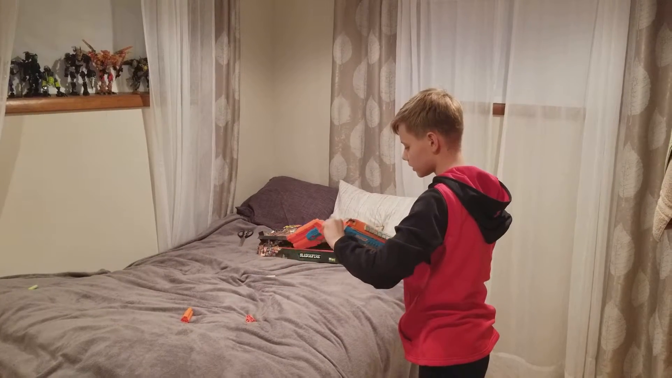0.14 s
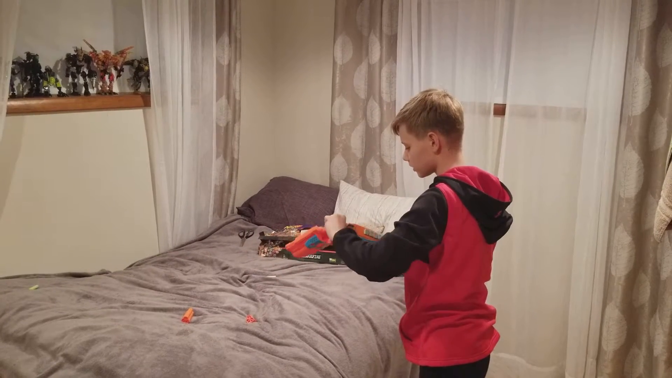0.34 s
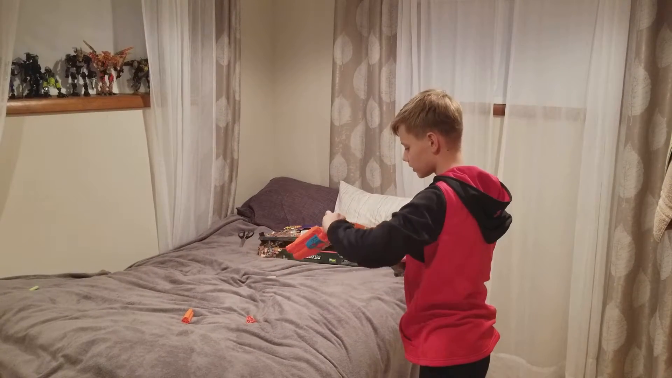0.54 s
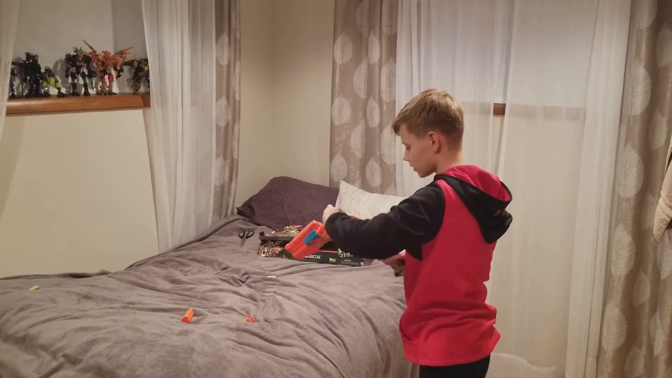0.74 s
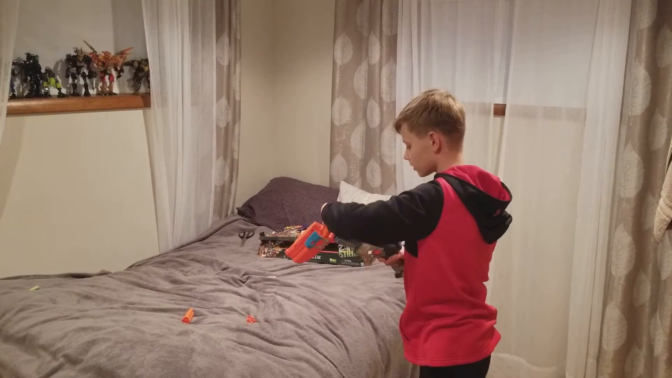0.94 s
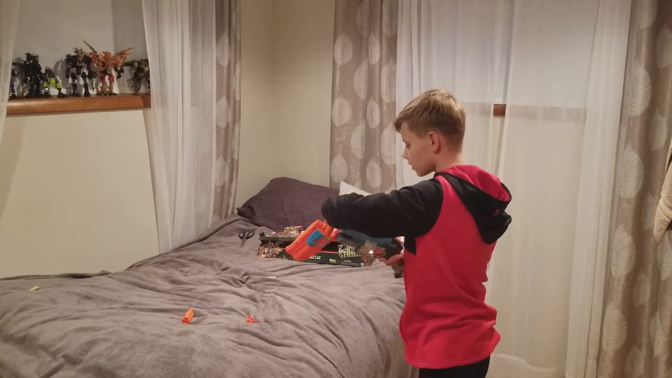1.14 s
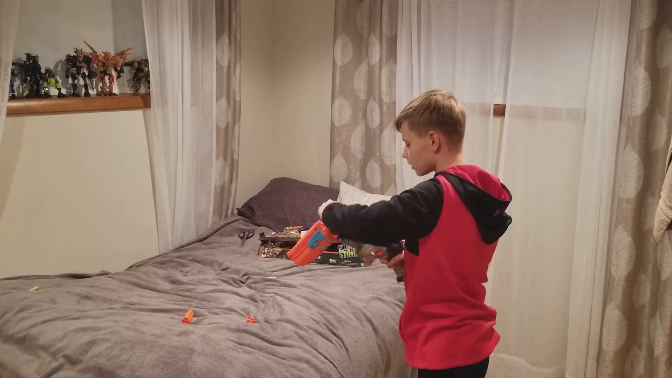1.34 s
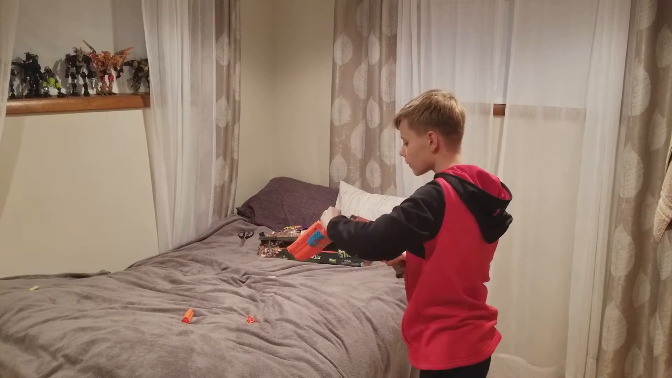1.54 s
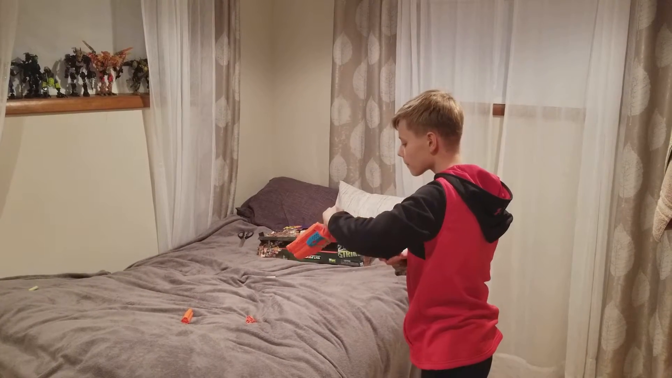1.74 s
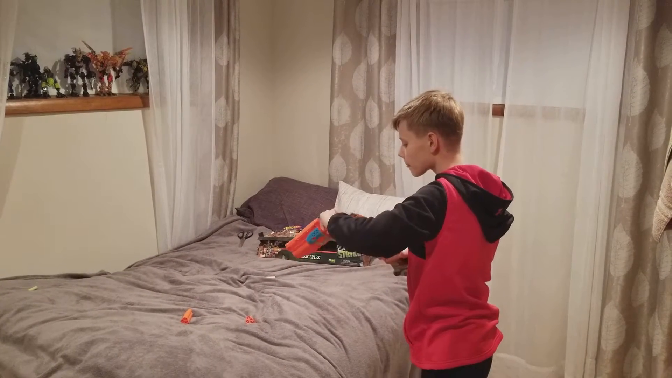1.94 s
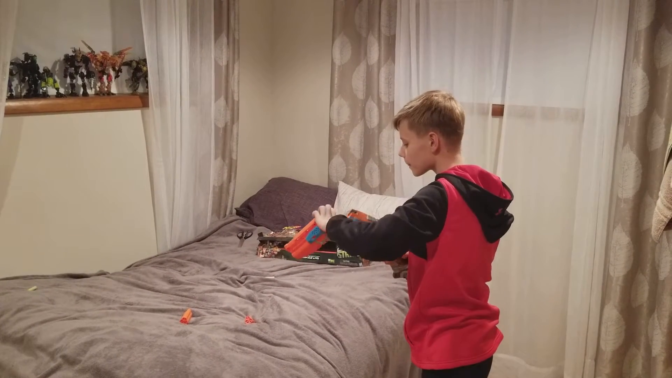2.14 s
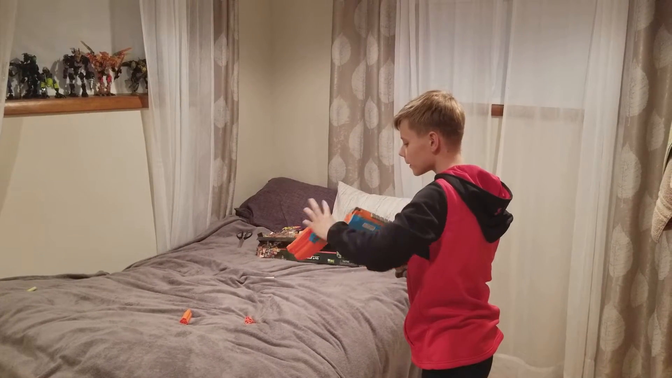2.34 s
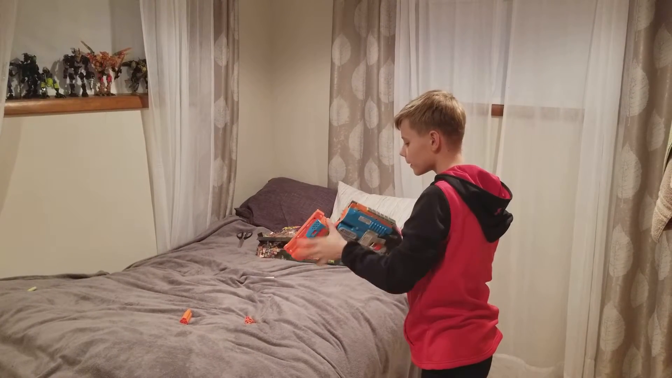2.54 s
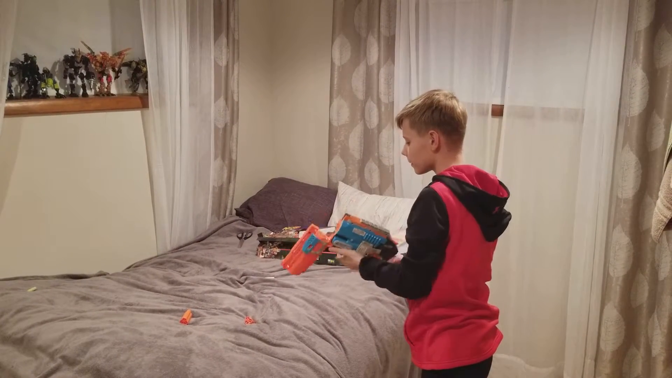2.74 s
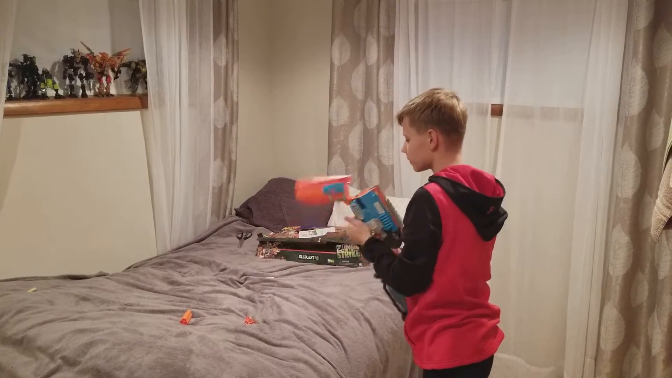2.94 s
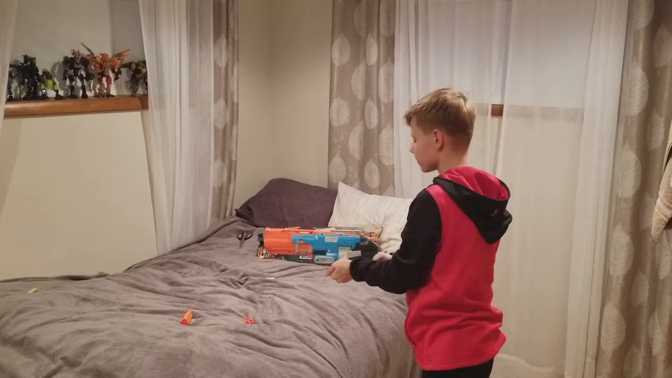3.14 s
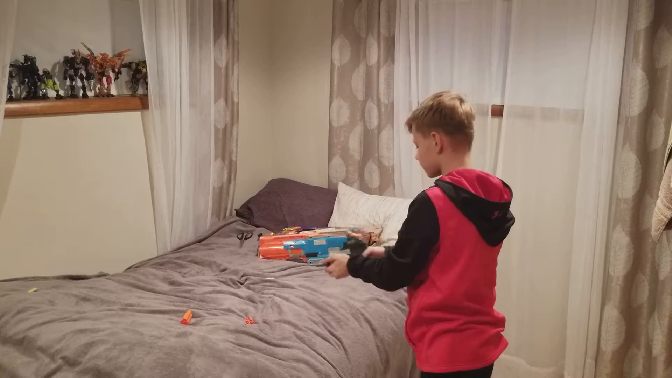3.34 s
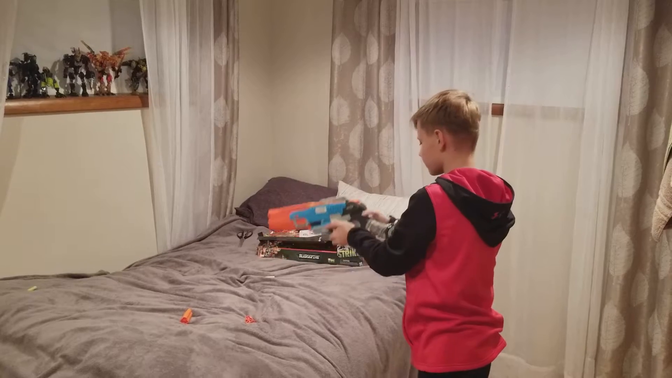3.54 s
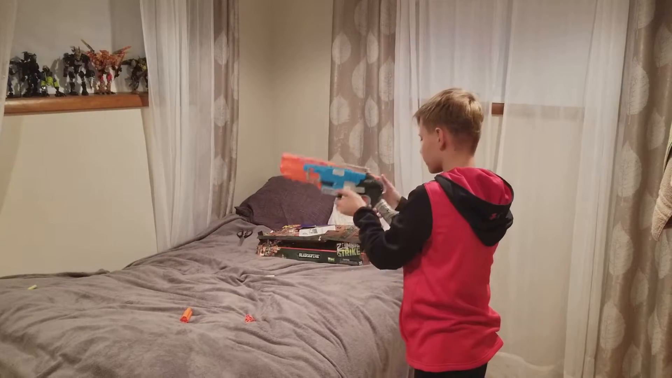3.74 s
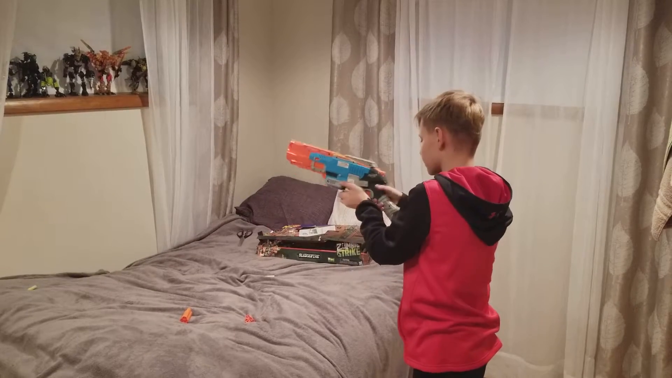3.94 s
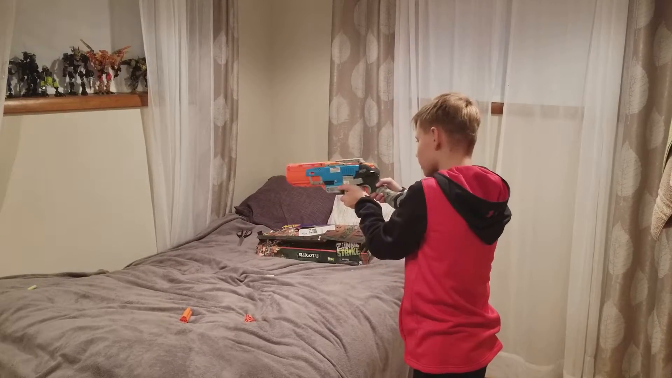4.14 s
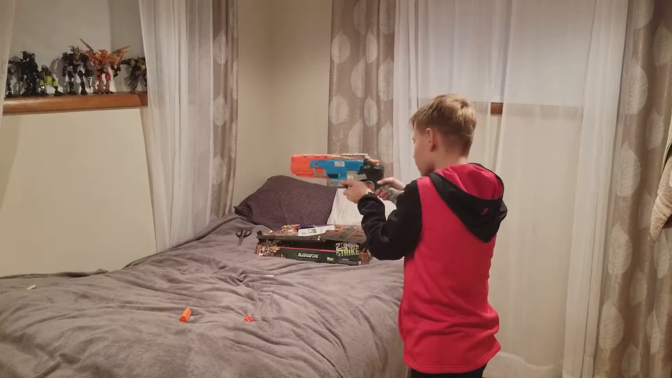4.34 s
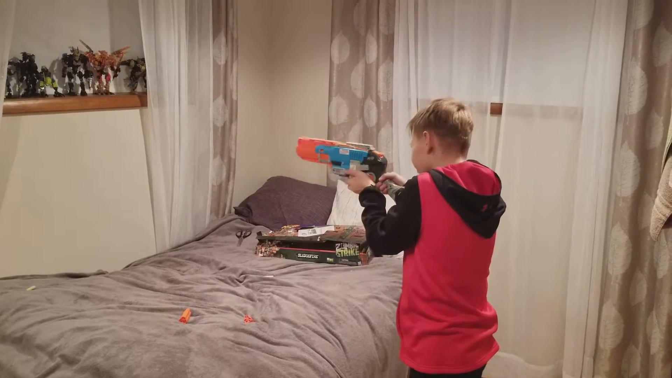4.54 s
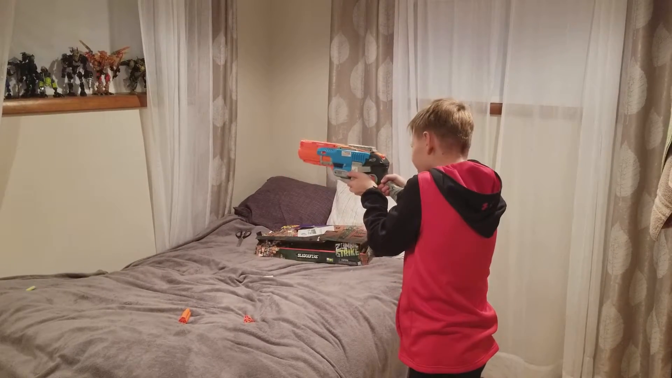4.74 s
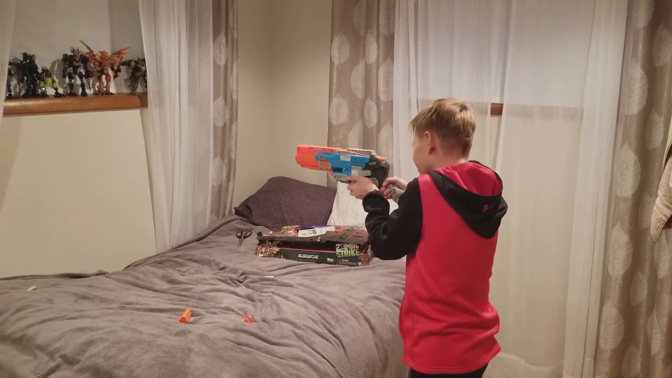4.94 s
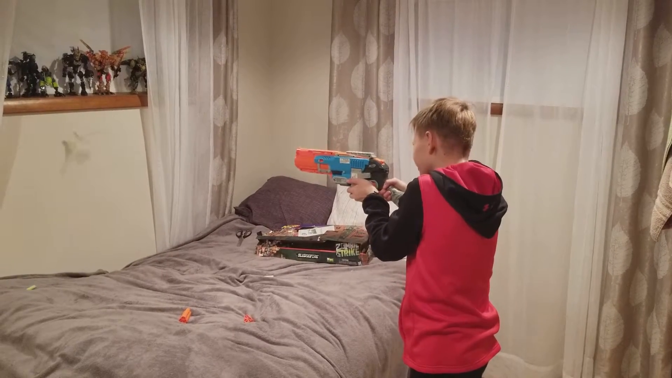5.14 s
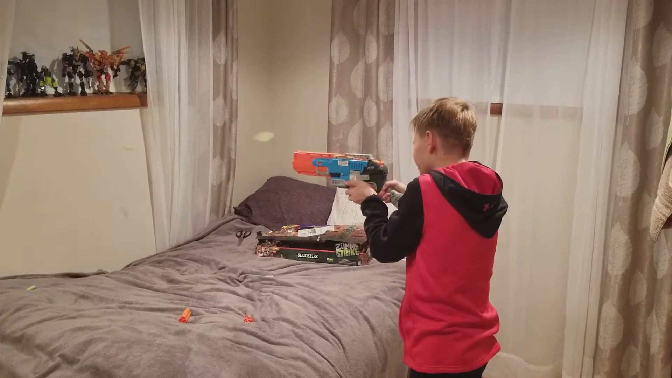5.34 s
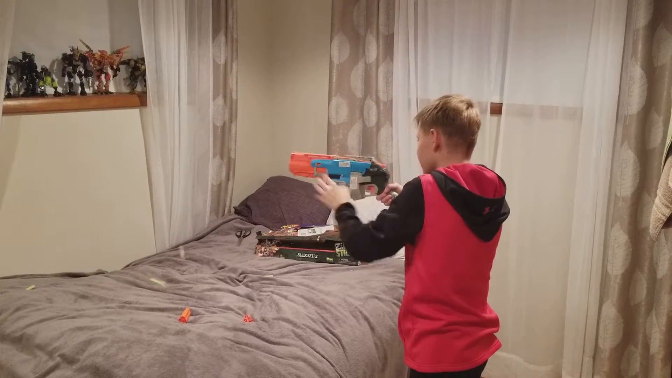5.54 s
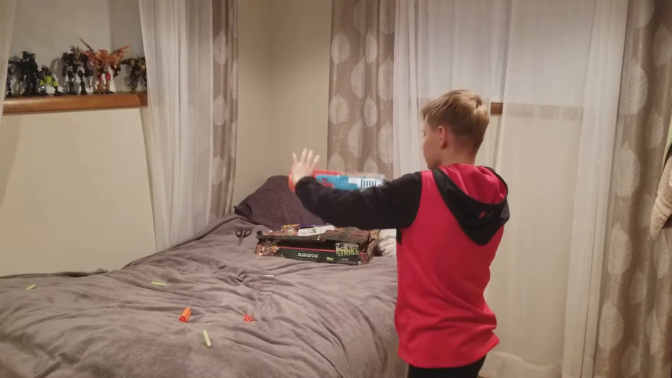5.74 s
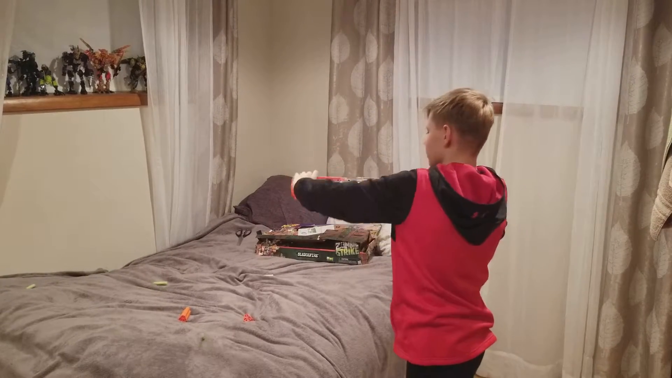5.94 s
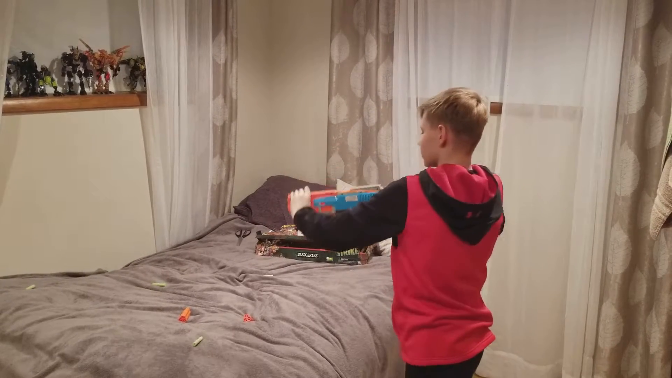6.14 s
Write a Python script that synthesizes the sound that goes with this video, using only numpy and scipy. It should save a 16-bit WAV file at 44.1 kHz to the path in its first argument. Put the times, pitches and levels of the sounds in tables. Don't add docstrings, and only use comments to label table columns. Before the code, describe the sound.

A small furnished bedroom with short echo, low house rumble and thin hiss, heard by a phone a few metres away. From 0 to 0.6 s, hollow plastic ticks, foam rubbing and bright scrapes as darts are seated in a toy blaster. Near quiet until 1.1 s, then more soft clicks and rubs to 1.6 s, and a busier scraping run from 1.8 to 2.2 s with a crisp latch at 1.94. A firm double clack lands at 2.3 s, with lighter clicks around 2.5. At 2.95 s a rasp rises straight into a very loud, sharp cocking slam at 3.0, leaving a faint metallic spring ring. The background dips, with few small ticks near 3.8 to 4.4 s. At 5.06 s the shot: plunger thump, low air boom, then a hard dart smack at 5.14 and a small bounce at 5.26. Faint rubbing and a soft grip click close by 5.9 s.

```python
import sys
import numpy as np
from scipy import signal
from scipy.fft import rfft, irfft
from scipy.io import wavfile
from scipy.ndimage import uniform_filter1d

SR = 44100
rng = np.random.default_rng(int(sys.argv[2]) if len(sys.argv) > 2 else 0)


def generate_wav(sig):
    pcm = np.round(np.clip(np.atleast_2d(sig).T, -1, 1) * 32767).astype(np.int16)
    wavfile.write(sys.argv[1], SR, pcm)


def nominal_scale(level):
    x = np.asarray(level, float) / 20
    return 10 ** x


N = 272979


def evened(x):
    return x / np.sqrt(np.mean(x ** 2) + 1e-20)


def read(points, hz):
    f, value = np.transpose(points)
    return np.interp(np.log(hz + 1), np.log(f + 1), value)


def add(mix, start_s, sound):
    part = mix[round(start_s * SR):][:len(sound)]
    part += sound[:len(part)]


def band(x, lo_hz, hi_hz):
    return signal.sosfilt(signal.butter(2, [lo_hz, hi_hz], "bandpass", fs=SR, output="sos"), x)


def ring(hz, level_db, t60_s, size=2500):
    t = np.arange(size) / SR
    return nominal_scale(level_db - 60 * t / t60_s) * np.sin(2 * np.pi * hz * t)


def partly_alike(left, other, likeness):
    return likeness * left + np.sqrt(1 - likeness ** 2) * other


# hz [Hz], level_db [dB]
FLOOR = [(24, -28), (70, -0.6), (160, -13.5), (270, -14), (400, -32), (650, -39), (1640, -49.5),
         (15500, -57.5)]
# hz [Hz], likeness [0-1]
FLOOR_LIKENESS = [(60, 1), (130, .93), (290, 1), (640, 0.2), (1400, .01), (15000, .01)]
# start_s [s], gain_db [dB]
SLOW_GAIN = [(0, 3), (2.949, 1.5), (3.1, -5.5), (4.05, -7), (4.4, 1.1), (5.05, .6), (5.2, -4), (5.7, .4),
             (6.19, -2.5)]


def background():
    size, hop = 2048, 512
    level_db, hiss_share, hiss_db = -56.5, .7, 5.5
    frames, hz = N // hop + 5, np.fft.rfftfreq(size, 1 / SR)
    a, b, c, d = rng.standard_normal((frames, len(hz), 4)).T
    left = a + 1j * b
    likeness = np.clip(read(FLOOR_LIKENESS, hz), -1, 1)[:, None]
    noise = np.array([left, partly_alike(left, c + 1j * d, likeness)])
    noise *= nominal_scale(read(FLOOR, hz))[:, None]
    noise *= nominal_scale(level_db) / np.std(signal.istft(noise[0], nperseg=size, noverlap=size - hop)[1])
    start_s, gain_db = np.transpose(SLOW_GAIN)
    gain_db = np.interp(np.arange(frames) * hop / SR, start_s, gain_db)
    rumble = np.clip(np.log2(1200 / (hz + 1)) / 2, 0, 1)[:, None]
    noise *= nominal_scale((rumble + (1 - rumble) * hiss_share) * gain_db + (1 - rumble) * hiss_db)
    return signal.istft(noise, nperseg=size, noverlap=size - hop)[1][:, :N]


def chatter_of(contact_s, rise_s, size):
    t, contact_s = np.arange(size) / SR, np.clip(contact_s, 5e-4, .008)
    cluster = rng.standard_normal(size) * np.exp(-t / contact_s) * np.minimum(t / rise_s, 1)
    z = rfft(cluster)
    power = abs(z) ** 2
    even = irfft(z / np.sqrt(power + 0.21 * np.mean(power)), size)
    return even * np.exp(-(t / (4 * contact_s)) ** 2)


# hz [Hz], level_db [dB], t60_s [s]
SHELL = [(618, -1.5, 0.025), (770, -15.5, 0.01), (1027, 0, 0.036), (1410, -2.5, .02), (1650, -5.5, .02),
         (1890, 16.5, .02), (2150, 16, .02), (2654, 9.5, .015), (3040, 10, 0.036), (3700, 8.5, 0.005),
         (4230, 3, 0.04), (5500, 7.5, 0.0078)]


def tick(treble_db, start_s, peak_db, pitch_hz, hollow_db):
    size = 3000
    contact_s = .0016 - .00005 * peak_db
    chatter = chatter_of(contact_s, 0.27 * contact_s + 1e-4, size)
    shift = rng.uniform(0.92, 1.02, len(SHELL))
    modes = [ring(hz * k, db - 9 * abs(np.log2(hz / pitch_hz)) / .7, t60_s)
             for k, (hz, db, t60_s) in zip(shift, SHELL)]
    body = signal.fftconvolve(chatter, sum(modes[2:]) + ring(pitch_hz, 9, 0.026))[:size]
    hollow = signal.fftconvolve(chatter, sum(ring(*mode) for mode in SHELL[:2]))[:size]
    crack = band(chatter, pitch_hz / 1.45, pitch_hz * 1.35) + .22 * band(chatter, 800, 5200)
    parts = (band(body, 750, 6200), crack, band(chatter, 4500, 13000), band(hollow, 520, 850))
    body, crack, fizz, hollow = (part / abs(part).max() for part in parts)
    mix = nominal_scale(-2.5) * body + crack + nominal_scale(treble_db) * fizz + nominal_scale(hollow_db) * hollow
    return start_s, nominal_scale(peak_db - 0.5) * mix


def stroke(treble_db, top_s, level_db, rise_s, fall_s, pitch_hz):
    slips_per_s, spread_db, width_hz = 1200, 5, 700
    corners_s = [max(top_s - rise_s, 0), top_s, top_s + fall_s]
    t = np.arange(corners_s[0], corners_s[-1], 1 / SR)
    light_db, light_treble_db = level_db - 25, treble_db + 1.5
    swell = nominal_scale(np.interp(t, corners_s, [light_db, level_db, light_db]) - 5)
    treble = nominal_scale(np.interp(t, corners_s, [light_treble_db, treble_db, light_treble_db]))
    slips = (rng.random(len(t)) < slips_per_s / SR) * rng.standard_normal(len(t))
    slips = slips * nominal_scale(spread_db * np.minimum(rng.exponential(1, len(t)), 4))
    body = signal.fftconvolve(slips, sum(ring(*mode) for mode in SHELL))[:len(t)]
    turn = np.exp(2j * np.pi * pitch_hz * np.arange(1, len(t) + 1) / SR)
    r = np.exp(-np.pi * width_hz / SR)
    part = (turn * signal.lfilter([1 - r], [1, -r], slips / turn)).real
    mix = 0.4 * evened(band(body, 500, 7000)) + 0.7 * evened(band(slips, 470, 4300))
    mix = mix + 0.7 * evened(band(part, 760, 5500))
    mix = mix + .45 * evened(band(slips, 480, 900))
    mix = evened(mix) + treble * evened(band(slips, 3200, 12000))
    return corners_s[0], swell * mix * signal.windows.tukey(len(t), .1)


# start_s [s], peak_db [dB], pitch_hz [Hz], hollow_db [dB]
SEATS = [(.0014, -36, 1050, -8), (.1801, -29.5, 1650, -25), (.2067, -28.5, 2300, -15.5),
         (.4991, -45, 1800, -3.5), (1.1912, -45.5, 1830, -5), (1.3573, -41.5, 1630, 2.5),
         (1.3863, -39.5, 2130, -8.5), (1.5815, -29, 1500, -11), (1.7883, -39, 2300, -11),
         (1.8617, -33, 1880, -8), (1.8844, -27, 2730, -37), (1.9829, -35.5, 1680, -12),
         (2.0712, -46, 1480, 7), (2.141, -36, 1720, -10), (2.1896, -37.5, 1820, -7.5),
         (2.521, -35, 1720, -21), (2.8629, -51.5, 1500, -4.5), (2.9113, -41, 1700, -7.5),
         (2.8988, -42.5, 1950, -.6), (2.9509, -30, 1910, 1.1)]


def dart_seats():
    return [tick(-33, *row) for row in SEATS]


# top_s [s], level_db [dB], rise_s [s], fall_s [s], pitch_hz [Hz]
SQUEEZES = [(.003, -49, .003, .045, 1680), (1.556, -52, .09, .05, 1790), (1.8, -43, .02, .25, 2000),
            (2.125, -52, .012, .3, 1780), (2.27, -54, .2, .1, 1710), (2.978, -39, .1, .012, 2000),
            (5.45, -64, .04, .25, 700), (5.67, -64, .012, .12, 700)]


def foam_squeezes():
    return [stroke(-30, *row) for row in SQUEEZES]


# start_s [s], peak_db [dB], pitch_hz [Hz],
# hollow_db [dB]
KNOCKS = [(.052, -46.5, 1620, 3), (.0997, -46.5, 1670, 4.5), (.1424, -27, 2300, -15),
          (1.072, -53, 2800, -15), (1.2411, -29, 1565, -15.5), (1.2798, -40.5, 1370, -1.5),
          (1.5452, -43, 1800, 3), (1.6093, -42, 1320, -11), (2.1204, -36, 1900, -21),
          (2.3141, -16, 2950, -21), (2.2408, -38, 1580, -4), (3.4033, -56.5, 1760, -21),
          (3.8142, -36.5, 2400, -12), (3.8786, -49, 1770, -15), (4.0322, -42, 1890, -23.5),
          (4.0938, -32.5, 1840, -17), (4.3952, -50, 1900, 6), (5.1464, -5, 1450, -22),
          (5.358, -52, 1900, -9)]


def loose_knocks():
    return [tick(-19.5, *row) for row in KNOCKS]


# top_s [s], level_db [dB],
# rise_s [s], fall_s [s], pitch_hz [Hz]
STROKES = [(.142, -44, .004, .3, 1300), (.206, -41, .07, .15, 1930), (.406, -41.5, .022, .135, 2200),
           (1.24, -45, .09, .09, 1570), (1.39, -41, .05, .045, 1910), (3.16, -60, .012, .08, 2100),
           (3.27, -72, .1, .08, 1964), (3.33, -69, .03, .06, 2086), (5.47, -68, .04, .06, 1660),
           (5.502, -66, .022, .15, 1633), (5.7, -56, .08, .05, 2450)]


def rasping_strokes():
    return [stroke(-16, *row) for row in STROKES]


# top_s [s], level_db [dB], rise_s [s], fall_s [s], pitch_hz [Hz]
SCRAPES = [(.3, -38.5, .03, .13, 3700), (.385, -51, .07, .05, 3700), (.505, -57, .06, .1, 3000),
           (1.584, -44.5, .022, .075, 1800), (1.868, -36, .075, .05, 3800), (1.946, -37.5, .008, .11, 4200),
           (2.985, -26.5, .012, .003, 2030), (5.73, -67, .1, .25, 2200)]


def edge_scrapes():
    return [stroke(-6, *row) for row in SCRAPES]


# start_s [s], peak_db [dB], pitch_hz [Hz], hollow_db [dB]
LATCHES = [(.3483, -23.5, 4230, -23), (.3659, -31.5, 3600, -18), (.4042, -28, 2140, -11),
           (.5944, -51, 3210, -4), (.776, -52, 1660, -9), (1.943, -22.5, 3900, -23.5),
           (2.5297, -27.5, 2600, -16), (2.613, -48.5, 1670, -11), (2.7879, -47.5, 1420, -12.5),
           (5.8426, -51, 1980, -2.1)]


def latch_ticks():
    return [tick(-9, *row) for row in LATCHES]


# start_s [s], peak_db [dB], contact_s [s]
BLOWS = [
    [(2.981, -21.5, 0.0054), (2.9968, -0.5, 0.0022), (3.001, -5.5, 0.0044), (3.0105, -10, 0.004),
     (3.0224, -11, 0.0059), (3.031, -14, 0.0068)],
    [(2.9889, -1.6, 0.0038)],
    [(5.0618, -4.5, 0.0056), (5.070, -9, 0.0069), (5.077, -13, 0.002), (5.085, -16.5, .004)],
    [(5.1428, -6, 0.0018), (5.1465, -3.5, 0.0013), (5.1495, -5.5, 0.003), (5.1605, -12, 0.0045)],
    [(5.8915, -29.5, 0.0021), (5.903, -41, 0.0028)],
    [(5.2600, -21.5, 0.0036), (5.275, -36.5, 0.003)],
    [(2.3530, -19, 0.0037), (2.358, -14, 0.0032)],
]
# hz [Hz], level_db [dB]
PARTS = [
    [(88, -50.5), (201, -15), (300, -20), (631, -1.5), (1100, -3), (1910, -.6), (5760, -23), (15500, -29)],
    [(290, -38), (600, -3), (1120, -14), (3850, -5), (6000, -10), (6930, -20.5), (12700, -21), (15500, -29)],
    [(350, -32), (600, -4), (915, -8), (1250, -9), (1760, -6.5), (2310, -12.5), (9760, -26), (15500, -26)],
    [(150, -30), (300, -8), (800, -9), (1170, 1.5), (1960, -5.5), (4400, -8), (8150, -15), (15500, -22)],
    [(88, -54), (150, -13.5), (643, -3.5), (877, -13), (1290, -7), (2920, -15), (5230, -27), (15500, -41)],
    [(350, -42), (788, -5), (953, -12), (1270, 1.5), (2750, -3.5), (4750, -14.5), (12800, -13.5),
     (15500, -29)],
    [(180, -50), (300, -18.5), (641, -.6), (1280, -4.5), (2070, -5.5), (2930, -8), (9290, -24.5),
     (15500, -22)],
]


def blow(colour, peak_db, contact_s):
    size = 4096
    chatter = chatter_of(contact_s, 0.00062, size)
    log_gain = read(colour, abs(np.fft.fftfreq(size, 1 / SR))) * np.log(10) / 20
    response = np.fft.ifft(np.exp(np.conj(signal.hilbert(log_gain)))).real
    sound = signal.fftconvolve(chatter, response[:2000])[:size]
    return nominal_scale(peak_db + 2) * sound / abs(sound).max()


def hard_blows():
    return [(start_s, blow(colour, *row)) for colour, rows in zip(PARTS, BLOWS) for start_s, *row in rows]


# hz [Hz], level_db [dB], t60_s [s]
DRUM = [(775, -47.5, .16), (742, -51, .2)]


def drum_hum():
    return [(2.535, ring(*mode, size=9000)) for mode in DRUM]


# hz [Hz], level_db [dB], t60_s [s]
SPRING = [(2060, -63, .9), (2085, -62, 1.1), (2131, -63, .9), (2690, -66, .8), (2755, -66, .8),
          (1500, -66, .8)]


def spring_song():
    return [(3.0, ring(*mode, size=24000)) for mode in SPRING]


# hz [Hz], level_db [dB], t60_s [s]
THUMP = [(120, -13, 0.1), (160, -10.5, .1), (205, -10.5, 0.14), (280, -11.5, 0.11), (328, -17, 0.2),
         (388, -19, 0.14), (457, -15, .14), (630, -11.5, 0.073), (661, -16, .14)]


def air_boom():
    size, low = 16000, np.zeros(N)
    swell = np.minimum(np.arange(size) / 300, 1)
    add(low, 5.063, swell * sum(ring(*mode, size=size) for mode in THUMP))
    return low + .5 * np.roll(low, 750)


# hz [Hz], t60_s [s]
ROOM = [(100, .4), (300, 0.21), (1000, 0.2), (4000, 0.2), (12000, 0.15)]
# hz [Hz], likeness [0-1]
ECHO_LIKENESS = [(100, 0.71), (300, 1), (700, .5), (1400, .05), (8000, 0.086)]


def room(x):
    size, first, spacing = SR // 2, 130, 12
    taps = np.zeros((2, size))
    at = np.arange(first, size - spacing, spacing)
    at = at + rng.integers(0, spacing, (2, len(at)))
    np.put_along_axis(taps, at, rng.choice([-1., 1.], at.shape), 1)
    hz, t, z = signal.stft(taps, SR, nperseg=256)
    likeness = np.clip(read(ECHO_LIKENESS, hz), -1, 1)[:, None]
    z[1] = partly_alike(z[0], z[1], likeness)
    decay = nominal_scale(-60 * t / read(ROOM, hz)[:, None])
    tail = signal.istft(z * decay, SR, nperseg=256)[1]
    return signal.fftconvolve(x[None], tail / np.linalg.norm(tail[0]), axes=1)[:, :N]


def scene():
    sounds = sorted(dart_seats() + loose_knocks() + latch_ticks(), key=lambda event: event[0])
    sounds += foam_squeezes() + rasping_strokes() + edge_scrapes()
    sounds += hard_blows() + drum_hum() + spring_song()
    paths = np.zeros((3, N))
    for k, (start_s, sound) in enumerate(sounds):
        add(paths[k % 3], start_s, sound)
    near = paths.sum(0)
    late = np.roll(near, 9)
    right = uniform_filter1d(near + late, 30) - late
    direct = np.array([near * nominal_scale(-2.2), right * nominal_scale(-5.6)])
    echoes = nominal_scale(-0.7) * sum(room(path) for path in paths)
    low = air_boom()
    boom = np.array([low * nominal_scale(1.2), np.roll(low, 8) * nominal_scale(2.0)])
    return direct + echoes + boom + nominal_scale(-13) * room(low) + background()


def roll_off(x):
    return signal.sosfilt(signal.butter(12, 16670, fs=SR, output="sos"), x)


def record(dry):
    low_pass = signal.firwin(255, 15800, window=("kaiser", 7), fs=SR)
    limited = signal.oaconvolve(dry, low_pass[None], "same")
    return roll_off(np.clip(limited, -1, 1))


dry = scene()
out = record(dry)
generate_wav(out)
```